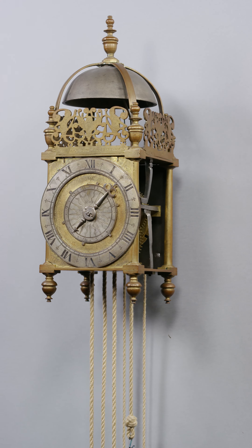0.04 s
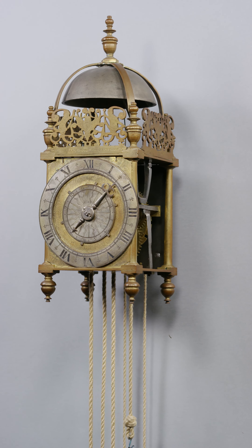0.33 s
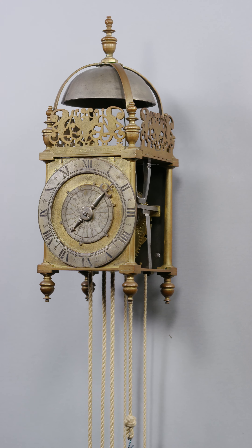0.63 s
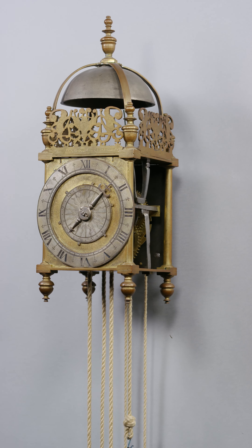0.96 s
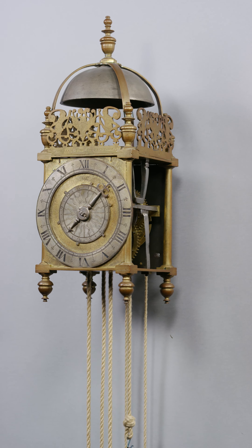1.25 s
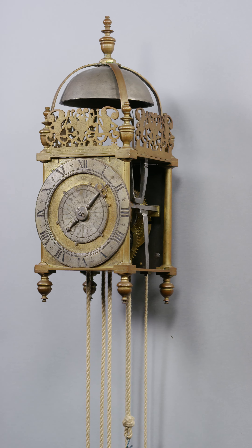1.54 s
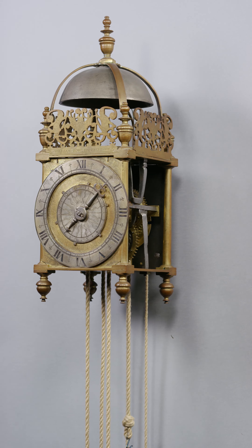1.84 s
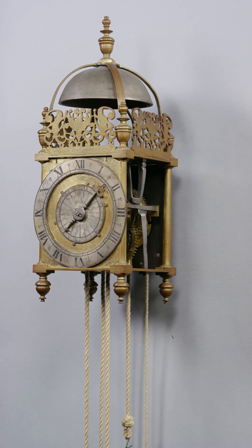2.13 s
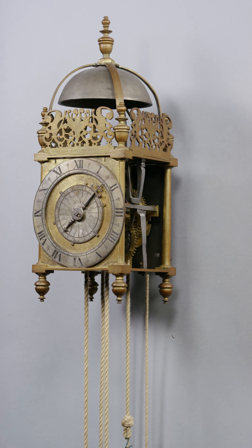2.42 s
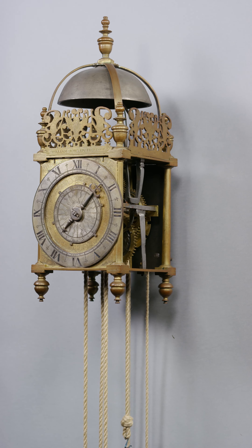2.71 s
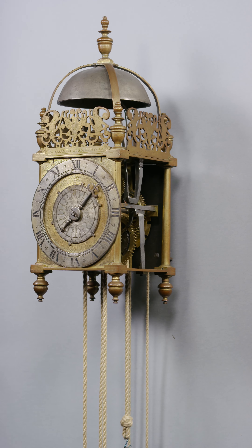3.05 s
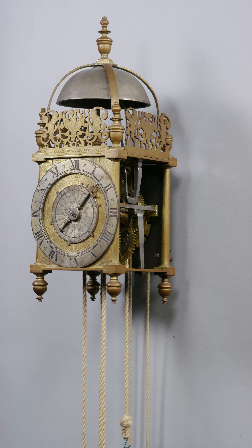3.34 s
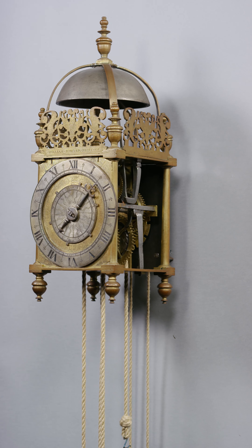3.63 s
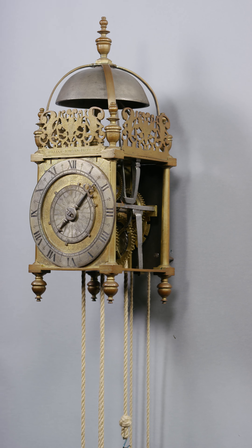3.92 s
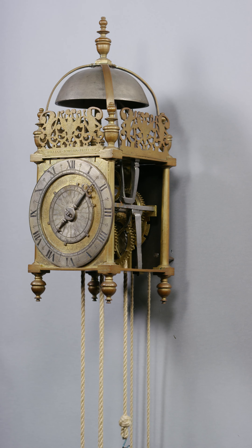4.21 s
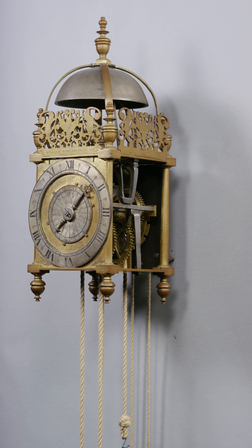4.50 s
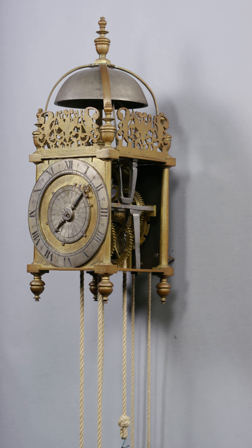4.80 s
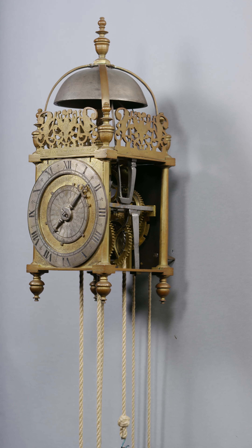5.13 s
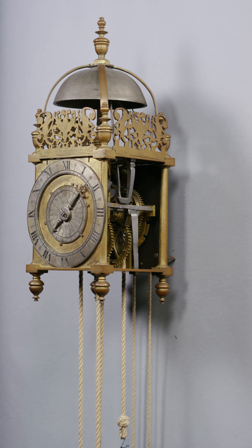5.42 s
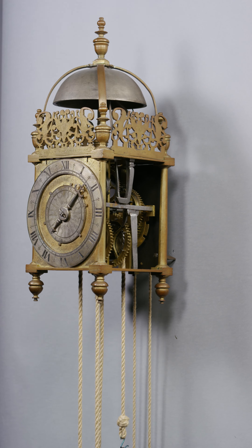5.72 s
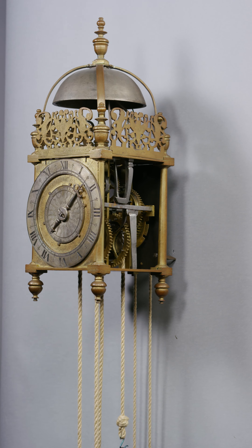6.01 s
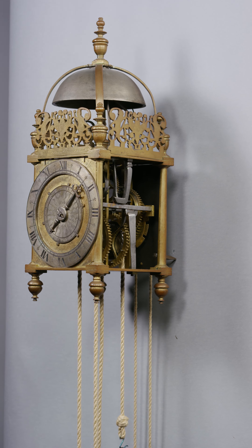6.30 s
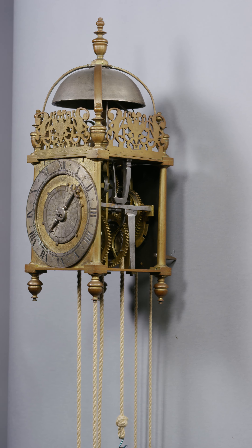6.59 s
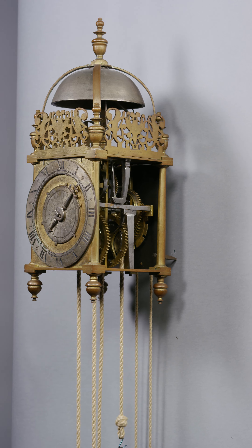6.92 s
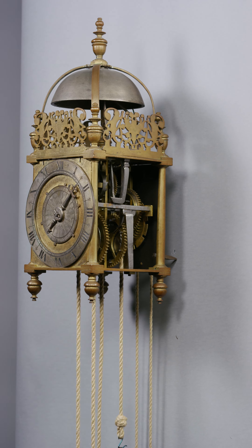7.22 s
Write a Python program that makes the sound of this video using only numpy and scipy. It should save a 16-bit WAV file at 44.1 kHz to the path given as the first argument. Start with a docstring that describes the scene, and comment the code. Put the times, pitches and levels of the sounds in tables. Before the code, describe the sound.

A weight-driven brass wall clock beats very slowly, close to the microphone in a small quiet room. A full tick alternates with a thinner, brighter tock, five beats in all, nearly two seconds apart. Each has a short metallic ring and a soft low thud through the wall. The wheels give a few dull clicks in between, over steady room air and a faint hum.

```python
"""Brass wall clock, close up.

A weight-driven clock beats slowly. Two pallets take turns to stop the crown wheel: a full tick,
then a thinner tock. Each blow rings the brass frame and thuds through the wall; the wheels click
softly in between. Behind it, a small quiet room: air, mains hum and a faint whirr."""
import sys
import numpy as np
from scipy import signal
from scipy.fft import rfft, irfft, next_fast_len
from scipy.io import wavfile

SR = 44100
rng = np.random.default_rng(int(sys.argv[2]) if len(sys.argv) > 2 else 0)


def to_wav(s):
    """Save 16-bit WAV."""
    ch = np.atleast_2d(s).T  # columns
    pcm = np.round(np.clip(ch, -1, 1) * 32767)  # PCM
    wavfile.write(sys.argv[1], SR, pcm.astype(np.int16))


N = 324135
EVENT_S = np.arange(int(1.5 * SR)) / SR  # time axis of one blow
TICK, TOCK = 0, 1  # level column in the mode tables

# pallet blows: (time [s], strength [dB], treble [dB], metal ring [dB], ring tilt [dB/octave],
# bell [dB], boom [dB])
TICK_BLOWS = [(0.1267, -1, 0.34, 3.5, 0.9, -7, 3), (3.7642, -.3, -1, 2, 0, -7, 1.5),
              (7.1702, 0.5, 2.4, 1.5, 2, 9, -0.5)]
TOCK_BLOWS = [(2.0359, -0.15, 0, 0.5, 0, -6, -2.5), (5.5036, -5, 1, 4.5, 0.5, -12, 4.5)]
# wheel clicks: (time [s], strength [dB], boom [dB])
WHEEL_CLICKS = [(1.169, 0.5, -18.5), (4.023, -15, -40), (4.7727, 3.5, -10.5), (6.377, -21, -43)]
# contact spectra: (frequency [Hz], level [dB])
TICK_CONTACT = [(500, -61), (1100, -55), (2000, -14), (4300, -28), (5150, -1.5), (6100, -13), (6800, -7),
                (8000, -11), (10200, -9.5), (11600, -26.5), (15000, -25)]
TOCK_CONTACT = [(500, -19), (3000, -27.5), (5200, -69), (8200, -25), (9500, -14), (10400, -12),
                (12200, -5.5), (14000, -13.5), (16000, -14.5)]
# spectra of the dense frame modes: (frequency [Hz], level [dB])
TICK_BODY = [(480, -28.5), (800, -19), (980, -14.5), (1120, -14), (1400, -20.5), (2000, -19), (3000, -17),
             (4300, -15.5), (5400, -19.5), (7800, -15), (9500, -23.5), (10400, -18.5), (11900, -32),
             (13300, -15.5), (15500, -27)]
TOCK_BODY = [(120, -29), (480, -33), (750, -22), (1100, -14), (1350, -21.5), (1600, -16.5), (2300, -23.5),
             (3600, -14.5), (4900, -23.5), (6200, -17.5), (8300, -21.5), (9700, -20.5), (12300, -23),
             (15500, -30)]
CLICK_BODY = [(150, -40), (500, -44), (880, -34), (1350, -47), (1900, -34), (2500, -42), (3200, -39),
              (6200, -40), (8600, -42), (10000, -51), (14000, -48), (16000, -70)]
# metal parts, wall bracket, room bass: (frequency [Hz], t60 [s], tick level [dB], tock level [dB])
METAL_MODES = [(812, .45, -52, -50), (962, .3, -49, -54), (1076, .22, -38.5, -43), (1140, .18, -44, -53),
               (2348, .2, -48, -55), (2385, .12, -42, -54), (2536, .33, -47, -49.5), (2776, .55, -44, -51),
               (3278, .42, -48, -59), (4000, .2, -52, -46), (4414, .28, -46, -51), (5184, .1, -37, -55),
               (5350, .2, -46, -62), (5693, .28, -50, -68), (5820, .15, -44, -58), (6052, .48, -54, -49),
               (6545, .25, -51, -54), (7642, .27, -48, -52), (7858, .37, -53, -49.5), (8538, .3, -47, -58),
               (8700, .4, -54, -66), (8961, .16, -66, -40), (9022, .45, -50, -58), (9869, .28, -54, -61),
               (10300, .15, -48, -66), (10541, .28, -52, -61), (10715, .25, -59, -54),
               (11042, .25, -46, -47), (12912, .13, -43.5, -56), (13379, .33, -44, -57),
               (13888, .32, -45.5, -58), (15240, .12, -46, -62)]
BRACKET_MODES = [(131.2, 1, -45.5, -47), (158.4, 1, -52, -62), (182.7, 0.3, -41, -40),
                 (223, 0.3, -45, -44.5), (290, 0.255, -76, -53), (339, 0.11, -45.5, -40)]
BOOM_MODES = [(77.55, 1.94, -45.5, -57.5), (83.7, 0.58, -39.5, -57.5), (98.4, 1.42, -40.5, -46),
              (103.3, 0.76, -45, -86)]
# sympathetic bell, wheel train: (frequency [Hz], t60 [s], level [dB])
BELL_MODES = [(4755, .3, -52), (4798, .8, -54)]
WHEEL_MODES = [(805, 0.37, -61), (863, 0.39, -56), (2760, .3, -79), (4400, 0.26, -60.5)]
# reverb spectrum: (frequency [Hz], gain [dB])
REVERB_GAIN = [(100, -5.5), (400, 7.5), (1000, -8.5), (2500, -10.5), (5000, -10.5), (9000, -19),
               (15000, -32)]
# reverb decay: (frequency [Hz], t60 [s])
REVERB_T60 = [(100, 0.29), (1000, 0.71), (4000, 0.53), (8000, 0.54), (16000, 0.72)]
# room air: (frequency [Hz], level [dB])
AIR_SPECTRUM = [(20, -53), (55, -38.5), (100, -37), (160, -42), (240, -43.5), (400, -45), (720, -46.5),
                (850, -49.5), (1200, -55), (1550, -54), (1800, -52), (2050, -58), (2700, -63), (5000, -66),
                (15500, -70.5)]
# mains hum and faint whines: (frequency [Hz], rms level [dB])
HUM_TONES = [(119.5, -61.5), (246, -72.5), (724, -74), (1308, -79.5), (1410, -83), (1750, -78),
             (1836, -84.5), (2455, -98), (5459, -90.5)]
# whirr envelope: (time [s], level [dB])
WHIRR_LEVELS = [(0, -75), (2.7, -73), (3.35, -70.5), (4.2, -73), (6.2, -77.5), (7.35, -71.5)]


def ticks():
    """A tooth lands on the first pallet and scrapes briefly."""
    scrape = envelope(rise_s=0.002, t60_s=0.022)
    return pallet(TICK_BLOWS, TICK, TICK_CONTACT, scrape, TICK_BODY,
                  body_t60_s=0.089, prompt_db=1, treble_hz=2400)


def tocks():
    """The second pallet is hit squarely: a short, bright snap."""
    snap = envelope(rise_s=0.0001, t60_s=0.013)
    return pallet(TOCK_BLOWS, TOCK, TOCK_CONTACT, snap, TOCK_BODY,
                  body_t60_s=0.096, prompt_db=5, treble_hz=6950)


def pallet(blows, column, contact_spectrum, contact_shape, body_spectrum, body_t60_s, prompt_db,
           treble_hz):
    """Each contact excites frame, metal parts, bracket, bell and wall. Returns (clatter, ring)."""
    clatter, ring = np.zeros((2, N))
    knock = modes(BRACKET_MODES, rise_s=0.003, column=column)
    bell = modes(BELL_MODES, rise_s=0.002)
    boom = wall_thud(column)
    for blow, cloud in zip(blows, mode_clouds(len(blows), likeness=0.67)):
        time_s, strength_db, treble_db, ring_db, tilt_db_per_oct, bell_db, boom_db = blow
        # a crisper contact is brighter and snaps more
        force = [(treble_hz / 2, strength_db), (treble_hz, strength_db + treble_db)]
        noise = rng.standard_normal(len(EVENT_S))
        contact = amp(treble_db) * colour(noise, contact_spectrum) * contact_shape
        body = frame(cloud, body_spectrum, body_t60_s, treble_rise_s=0.0001)
        metal = amp(ring_db) * metal_ring(column, prompt_db, tilt_db_per_oct)
        add(clatter, time_s, colour(contact + body, force))
        add(ring, time_s, colour(metal + knock, force))
        add(ring, time_s, amp(bell_db) * bell + amp(boom_db) * boom)
    return np.array([clatter, ring])


def mode_clouds(count, likeness):
    """Crowded modes as noise, one row per blow; blows on the same spot are partly alike."""
    shared, *own = rng.standard_normal((count + 1, len(EVENT_S)))
    return np.sqrt(likeness) * shared + np.sqrt(1 - likeness) * np.array(own)


def frame(cloud, spectrum, treble_t60_s, treble_rise_s, split_hz=3200):
    """Bending waves disperse: treble arrives first, lower modes build later and last longer."""
    body = colour(cloud, spectrum)
    hz = np.fft.rfftfreq(len(body), 1 / SR)
    bass = irfft(rfft(body) / (1 + (hz / split_hz) ** 4), len(body))
    bass_shape = envelope(rise_s=0.0008, t60_s=1.34 * treble_t60_s)
    return (body - bass) * envelope(treble_rise_s, treble_t60_s) + bass * bass_shape


def metal_ring(column, prompt_db, tilt_db_per_oct, pivot_hz=4500, rise_s=0.001):
    """Wheels and plates shed some energy promptly into the frame, then ring on."""
    out = np.zeros(len(EVENT_S))
    for (hz, t60_s, *levels_db), phase in zip(METAL_MODES, rng.random(len(METAL_MODES))):
        decay = envelope(rise_s, t60_s) + amp(prompt_db) * envelope(rise_s, 0.29 * t60_s)
        tilt_db = tilt_db_per_oct * np.log2(hz / pivot_hz)  # set by where the tooth lands
        out += amp(levels_db[column] + tilt_db) * decay * np.sin(2 * np.pi * (hz * EVENT_S + phase))
    return out


def wall_thud(column, delay_s=0.02826, rise_s=0.0061):
    """The halted weight jolts the wall; the room booms a moment later."""
    out = np.zeros(len(EVENT_S))
    for hz, t60_s, *levels_db in BOOM_MODES:
        tone = np.sin(2 * np.pi * hz * (EVENT_S - delay_s))
        out += amp(levels_db[column]) * envelope(rise_s, t60_s, delay_s) * tone
    return out


def wheel_clicks():
    """The wheels take up slack with soft, dull knocks. Returns (clatter, ring)."""
    clatter, ring = np.zeros((2, N))
    wheels, boom = modes(WHEEL_MODES, rise_s=0.013), wall_thud(TICK)
    clouds = mode_clouds(len(WHEEL_CLICKS), likeness=0.88)
    for (time_s, strength_db, boom_db), cloud in zip(WHEEL_CLICKS, clouds):
        body = frame(cloud, CLICK_BODY, treble_t60_s=0.092, treble_rise_s=0.0009)
        add(clatter, time_s, amp(strength_db) * body)
        add(ring, time_s, amp(strength_db) * wheels + amp(boom_db) * boom)
    return np.array([clatter, ring])


def reverb(x, low_cut_hz=200):
    """Dense small-room reflections, each band decaying at its own rate."""
    hz, time_s, bands = signal.stft(rng.standard_normal(len(EVENT_S)), SR, nperseg=256)
    t60_s = log_interp(REVERB_T60, hz)[:, None]
    unit_energy = np.sqrt(2 * np.log(1000) / (t60_s * SR))
    bands *= 1000 ** (-time_s / t60_s) * unit_energy
    tail = signal.istft(bands, SR, nperseg=256)[1][:len(EVENT_S)]
    onset = envelope(rise_s=0.0046, t60_s=np.inf, delay_s=0.0058)
    response = colour(tail, REVERB_GAIN) * onset
    return signal.fftconvolve(highpass(x, low_cut_hz), response)[:N]


def room_air():
    """Steady, bass-heavy noise."""
    return colour(rng.standard_normal(N), AIR_SPECTRUM)


def hum(phase_step_rad=0.126):
    """Mains hum and faint whines; each phase wanders in proportion to its pitch."""
    time_s, knots_s = np.arange(N) / SR, np.linspace(0, N / SR, 30)
    out = np.zeros(N)
    for hz, rms_db in HUM_TONES:
        walk = np.cumsum(rng.standard_normal(len(knots_s)))
        drift_rad = np.interp(time_s, knots_s, walk) * phase_step_rad * hz / HUM_TONES[0][0]
        out += np.sqrt(2) * amp(rms_db) * np.sin(2 * np.pi * hz * time_s + drift_rad)
    return out


def whirr(centre_hz=1745, half_width_hz=55, flutter_db=2, flutters_per_s=8):
    """Noise in one narrow resonance, gently swelling and sinking."""
    hz, time_s = np.fft.rfftfreq(N, 1 / SR), np.arange(N) / SR
    band = irfft(rfft(rng.standard_normal(N)) / (1 + ((hz - centre_hz) / half_width_hz) ** 2), N)
    knots = rng.standard_normal(128)
    flutter = np.interp(time_s * flutters_per_s, np.arange(len(knots)), knots)
    level_db = np.interp(time_s, *np.transpose(WHIRR_LEVELS)) - flutter_db * flutter
    return amp(level_db) * band / band.std()


def modes(table, rise_s, column=0):
    """Decaying sines; neighbouring modes swing in opposite directions."""
    out = np.zeros(len(EVENT_S))
    for k, (hz, t60_s, *levels_db) in enumerate(table):
        tone = (-1) ** k * np.sin(2 * np.pi * hz * EVENT_S)
        out += amp(levels_db[column]) * envelope(rise_s, t60_s) * tone
    return out


def envelope(rise_s, t60_s, delay_s=0):
    """Exponential rise and decay."""
    age_s = np.maximum(EVENT_S - delay_s, 0)
    return (1 - np.exp(-age_s / rise_s)) * 1000 ** (-age_s / t60_s)


def amp(db):
    """Decibels to gain."""
    return 10 ** (np.asarray(db) / 20)


def log_interp(points, hz):
    """Interpolates (frequency [Hz], value) points over log frequency."""
    knots_hz, values = np.transpose(points)
    return np.interp(np.log(hz + 1), np.log(knots_hz + 1), values)


def colour(x, spectrum):
    """Filters x by (frequency [Hz], gain [dB]) points."""
    size = next_fast_len(len(x) + SR // 10)
    gain = amp(log_interp(spectrum, np.fft.rfftfreq(size, 1 / SR)))
    return irfft(rfft(x, size) * gain, size)[:len(x)]


def highpass(x, cutoff_hz, order=2):
    """Bass roll-off."""
    return signal.sosfilt(signal.butter(order, cutoff_hz, "high", fs=SR, output="sos"), x)


def add(mix, time_s, sound):
    """Mixes a sound in at time_s."""
    part = mix[round(time_s * SR):][:len(sound)]
    part += sound[:len(part)]


def scene():
    """Clock, reverb and background, in mono."""
    clatter, ring = ticks() + tocks() + wheel_clicks()
    ring = highpass(ring, cutoff_hz=58, order=3)  # the wall radiates nothing below its lowest modes
    reflections = reverb(clatter + amp(-16) * ring)
    return (clatter + ring + reflections + room_air() + hum() + whirr())[None]


def record(dry, low_cut_hz=42, high_cut_hz=15950):
    """Microphone bass roll-off and a steep treble limit."""
    lowpass = signal.firwin(301, high_cut_hz, window=("kaiser", 8), fs=SR)
    return signal.oaconvolve(highpass(dry, low_cut_hz), lowpass[None], "same")


dry = scene()
out = record(dry)
to_wav(out)
```